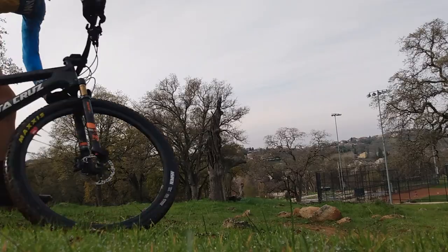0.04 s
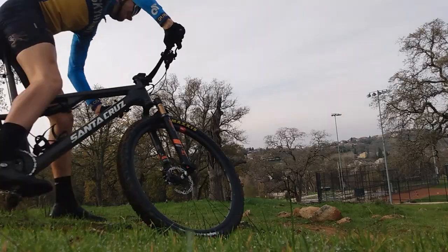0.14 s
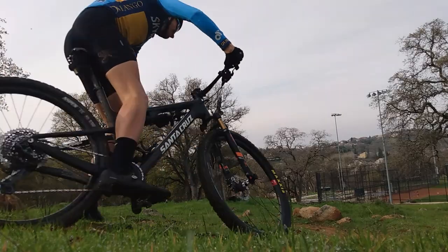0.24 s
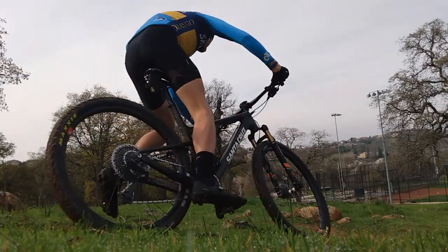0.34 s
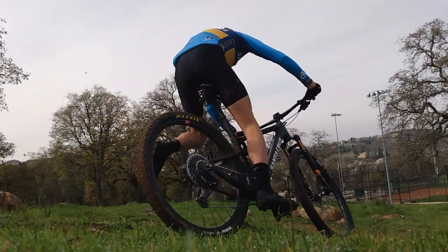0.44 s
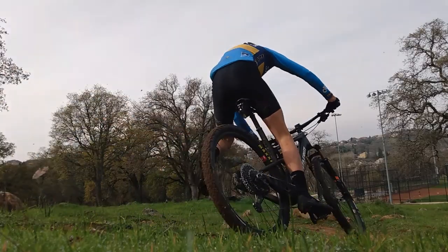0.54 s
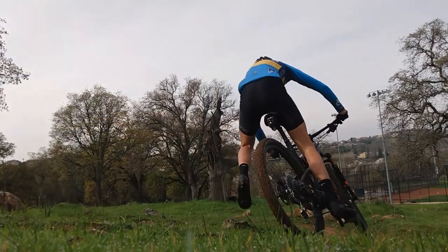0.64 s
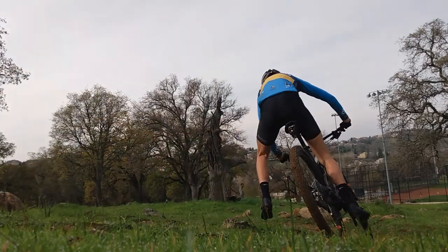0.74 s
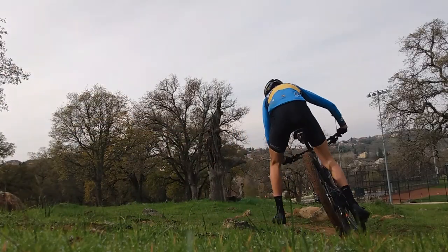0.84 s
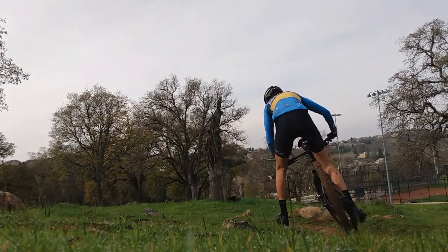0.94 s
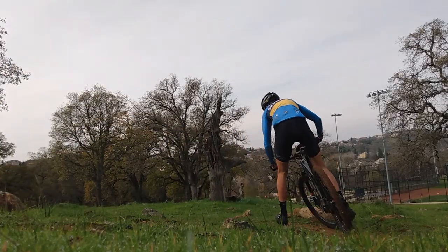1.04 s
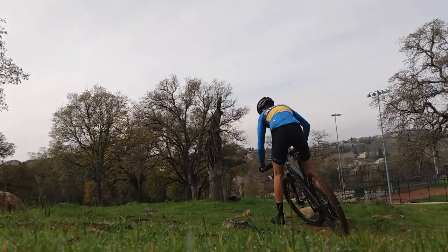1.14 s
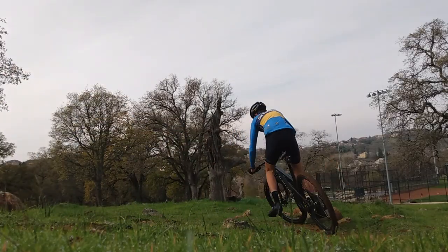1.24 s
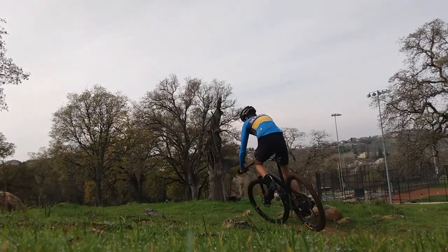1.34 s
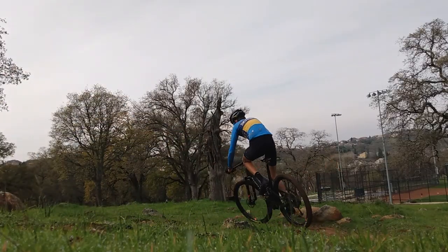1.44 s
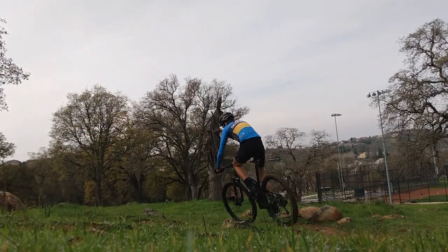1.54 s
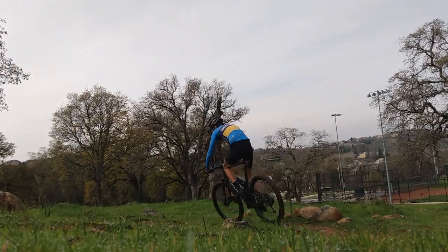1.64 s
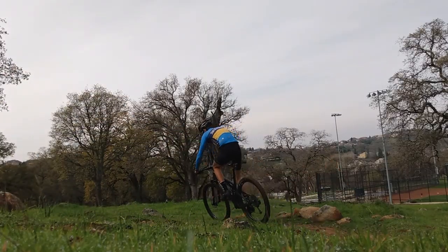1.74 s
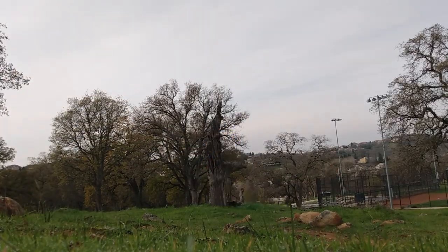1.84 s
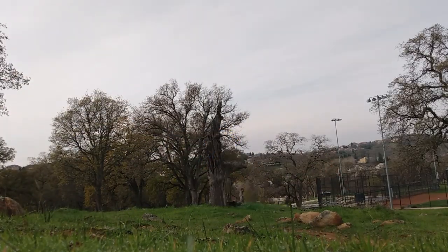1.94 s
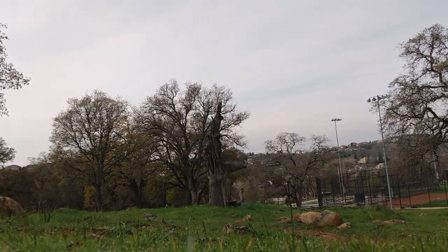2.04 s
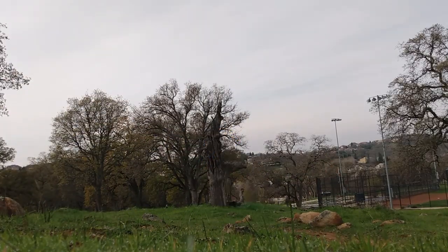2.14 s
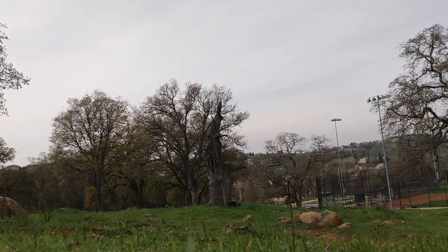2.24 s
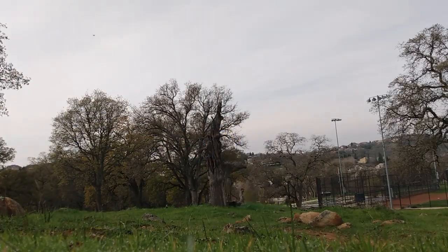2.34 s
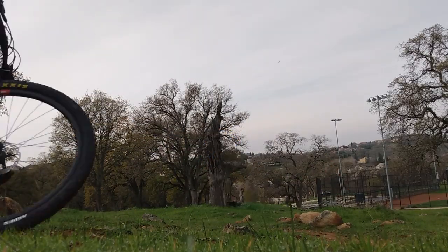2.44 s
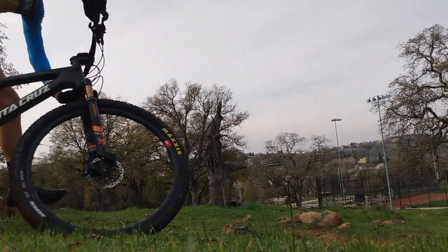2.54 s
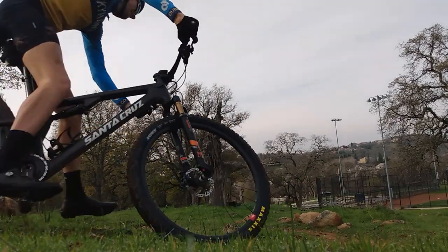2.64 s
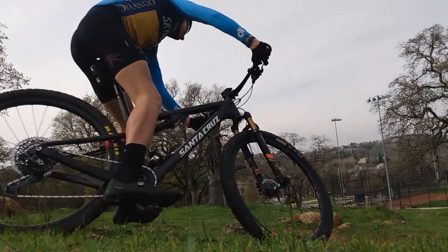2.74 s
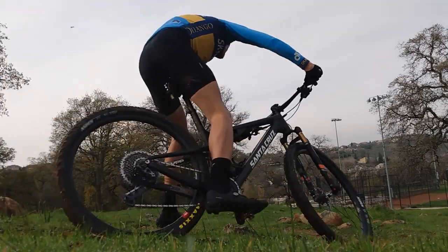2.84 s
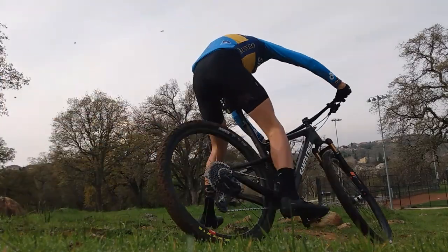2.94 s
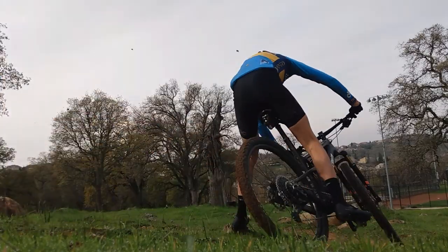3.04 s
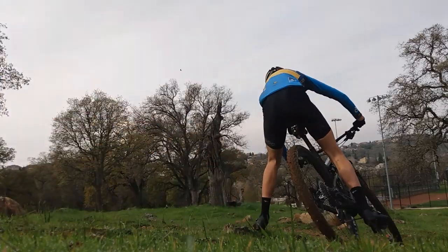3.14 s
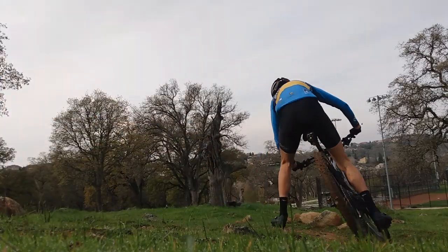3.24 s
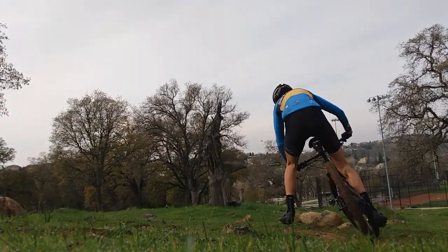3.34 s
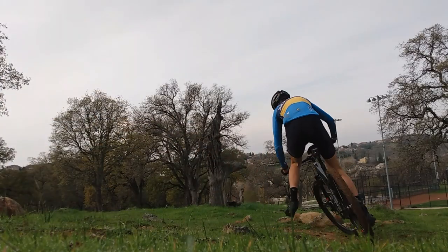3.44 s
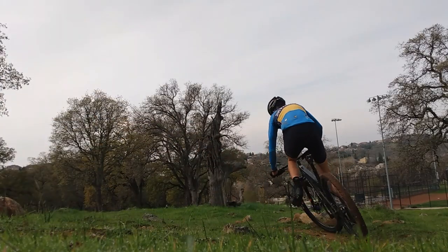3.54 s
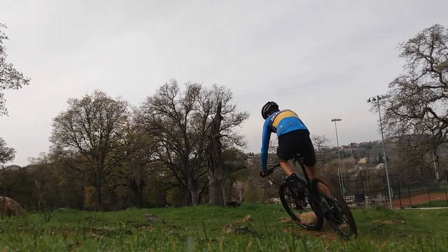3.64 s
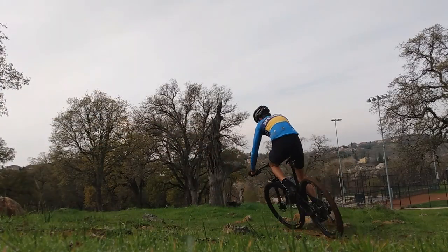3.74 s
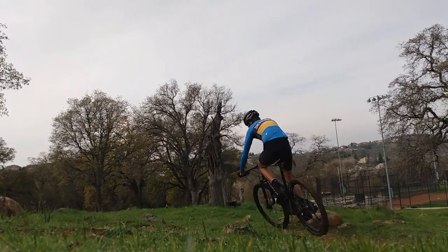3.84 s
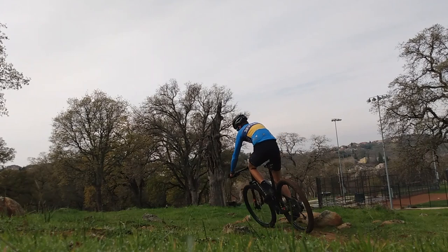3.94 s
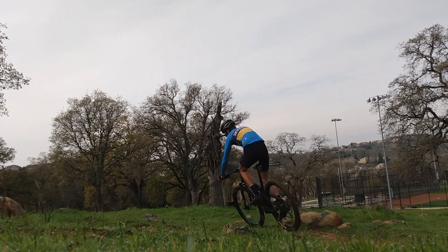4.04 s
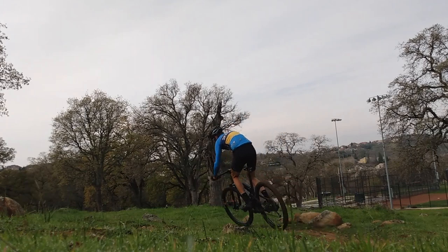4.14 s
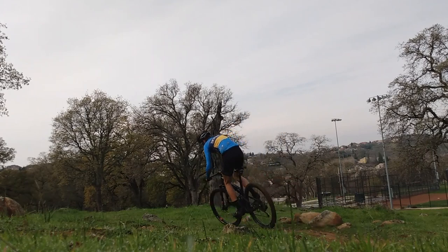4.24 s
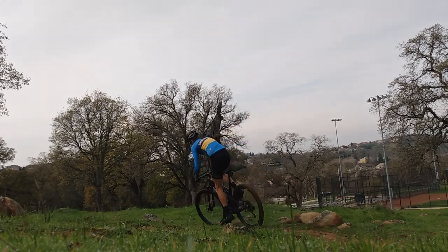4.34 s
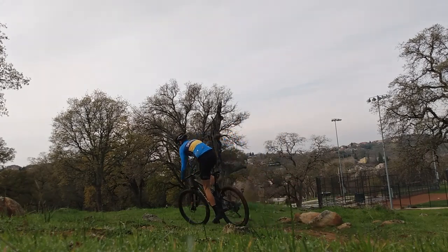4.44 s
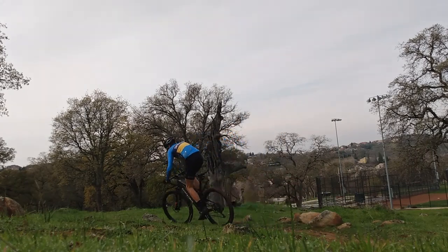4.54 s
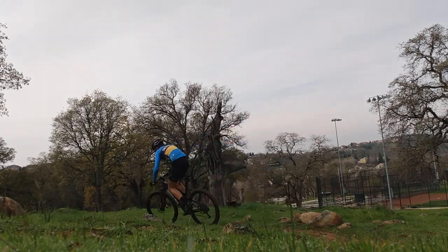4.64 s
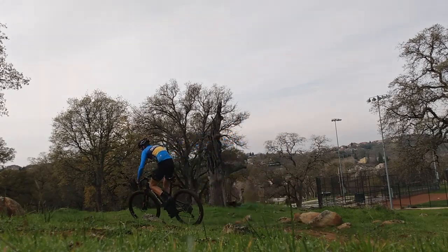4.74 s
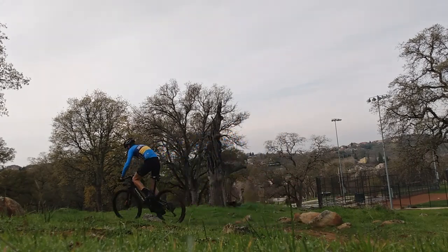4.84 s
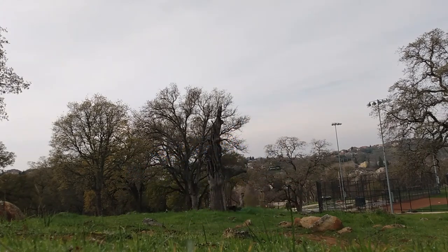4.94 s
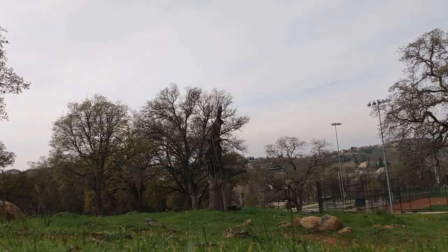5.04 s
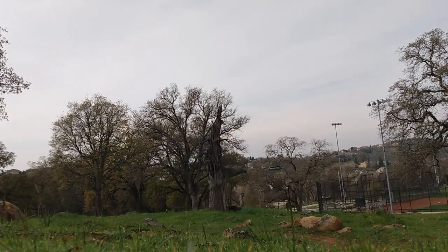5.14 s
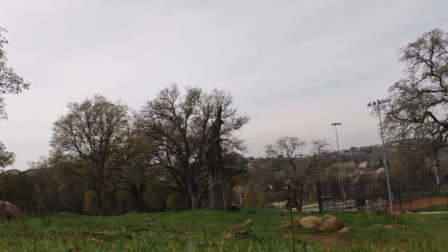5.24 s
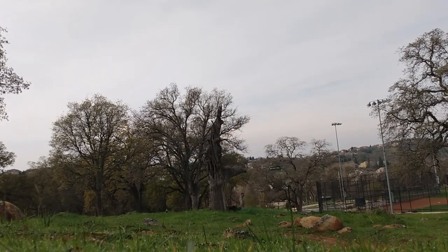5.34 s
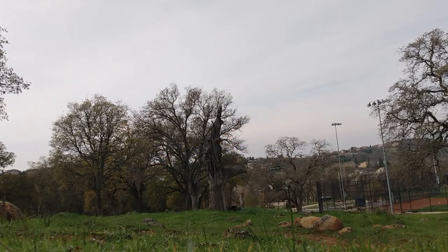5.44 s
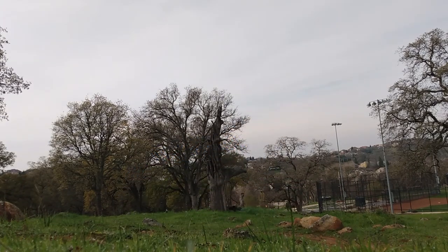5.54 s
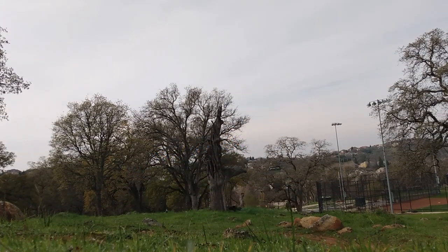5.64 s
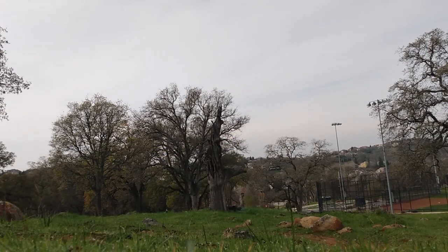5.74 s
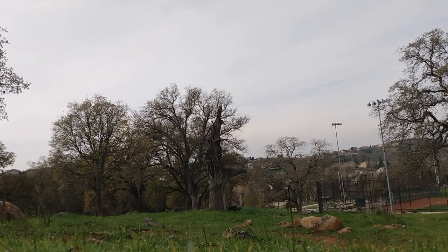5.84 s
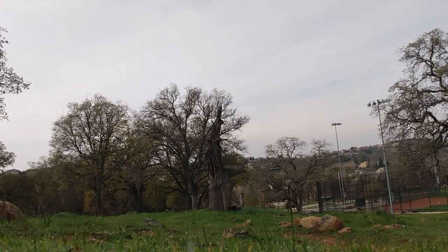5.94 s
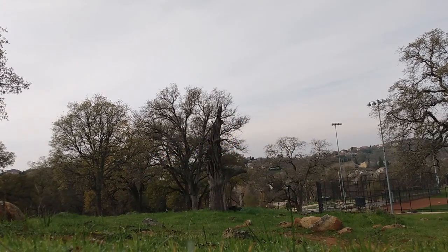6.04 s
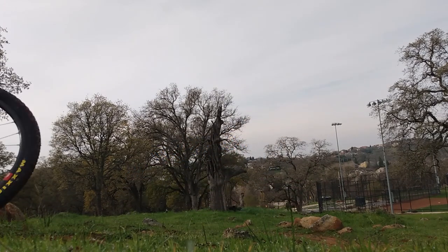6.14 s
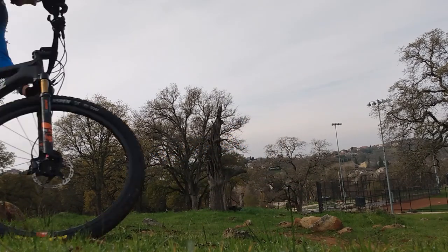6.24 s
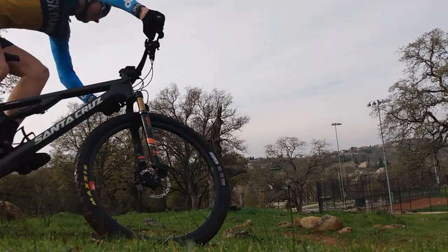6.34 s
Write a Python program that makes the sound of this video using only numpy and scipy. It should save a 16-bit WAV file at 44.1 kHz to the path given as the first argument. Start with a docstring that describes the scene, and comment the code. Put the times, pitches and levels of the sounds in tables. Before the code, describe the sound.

A mountain bike coasts over dirt and grass past a low stereo microphone outdoors. It begins already close on the right: scraping, gritty tyres, a very hard knock at 0.1 s and low ground thumps. From 0.3 s a sharp metallic freewheel ratchet buzzes as the bike swings ahead by about 0.4 s, slowing and fading under gusty low wind, with small bumps near 1.7 s. A brief dip at 1.87 s joins a second approach: knocks at 2.1 s, a strong tyre scrub at 2.5 s, bright ratcheting and roar peaking around 2.9 s, then a violent rattling cluster at 3.2 s. It recedes, with a jolt at 3.9 s and thin chain whirr and sparse ticks until 4.9 s. After another dip at 4.97 s, very faint ratcheting and tyre hiss grow on the right, clearer after 6 s, cutting off at 6.4 s.

```python
"""A mountain bike coasts past a low pair of microphones in three passes, joined by short fades.
First it is close, knocks hard, swings from the right to ahead at 0.4 s and recedes; from 1.87 s it nears again,
swings at 2.9 s, clatters at 3.2 s and recedes; from 4.97 s it nears once more, ending still on the right.
Tyres and chain are coloured grains, narrow bands resonant noise, ratchet snaps and knocks decaying bursts;
filtered noise makes the ground thumps, gusty wind and distant hush beneath."""
import sys
import numpy as np
from scipy import signal
from scipy.fft import rfft, irfft
from scipy.io import wavfile
from scipy.ndimage import uniform_filter1d, map_coordinates

SR = 44100
rng = np.random.default_rng(int(sys.argv[2]) if len(sys.argv) > 2 else 0)


def inscribe(sig):
    """Save sig as 16-bit PCM at rate SR to the path in sys.argv[1].

    A 1-D sig is mono; a 2-D sig holds one channel per row.
    Samples are clipped to [-1, 1] before scaling.
    """
    pcm = np.round(np.clip(np.atleast_2d(sig).T, -1, 1) * 32767)
    wavfile.write(sys.argv[1], SR, pcm.astype(np.int16))


def attenuation_scalar(level_db):
    """Turn a level in dB into a linear amplitude multiplier (20 dB per decade)."""
    decades = np.asarray(level_db, float) / 20
    return 10 ** decades


N = 281648

# Passes. Each row: start in seconds, end in seconds.
PASSES_S = [(0, 1.87), (1.87, 4.965), (4.965, 6.39)]
FADE_OUT_S, FADE_IN_S = 0.035, 0.015

# Swing from right to ahead, a row a pass. Each row: middle in seconds, time constant in seconds.
SWINGS_S = [(0.422, 0.21), (2.948, 0.21), (6.75, 0.395)]
RIGHT_MS, AHEAD_MS = 0.371, -0.095  # delay of the left port at either end of the swing
# Likeness of the ports. Each row: frequency in Hz, likeness from 0 to 1.
LIKENESS = [(60, 0.13), (130, 0.76), (500, 0.91), (1500, 0.65), (3000, 0.47), (6000, 0.17), (15000, 0.15)]
# Treble lean to the side of the bike. Each row: frequency in Hz, multiplier of the lean.
LEAN_SHARE = [(100, 0.11), (1000, .3), (4000, .8), (10000, 0.97), (16000, 4.9)]
LEAN_DB, LEAN_DB_PER_MS = 0.5, -6.5  # left over right, before LEAN_SHARE

# Spectra of the surroundings. Each row: frequency in Hz, relative level in dB per Hz.
GROUND_DB = [(45, -25.5), (65, -7.5), (85, -8), (125, -2.5), (170, -15.5), (240, -19.5)]
WIND_DB = [(15, -5.5), (30, -10.5), (50, -1.5), (80, 1.5), (130, -22.5)]
HUSH_DB = [(200, 8), (400, 1.5), (1200, -1), (1700, -1), (2500, -11), (4500, -8.5), (8000, -14.5),
           (12000, -22), (16000, -30)]
HUSH_LEVEL_DB = -73
# Breeze before gusts. Each row: time in seconds, level in dB.
BREEZE_DB = [(0, -60), (.5, -64), (.85, -59.5), (1.0, -60), (1.25, -59), (1.45, -64), (1.86, -54.5),
             (1.88, -97), (2.4, -83), (2.65, -58), (3.0, -72.5), (3.55, -66.5), (3.8, -73.5), (4.05, -81),
             (4.96, -85.5), (4.97, -78), (5.15, -68.5), (5.4, -72.5), (5.7, -62.5), (5.9, -72), (6.39, -66)]
BUFFET_DB, ROLL_DB, GUST_DB = -6.5, -18.5, 4  # buffet over breeze, rumble over nearness, gust depth
# Wheel thumps through the ground. Each row: start in seconds, length in seconds, level in dB.
THUMPS = [(0.05, 0.15, -56.5), (0.16, 0.18, -39.5), (0.332, 0.079, -47.5), (0.436, 0.032, -47),
          (.57, 0.035, -75), (0.785, .09, -53.5), (1.045, 0.017, -56), (1.227, 0.055, -62.5),
          (1.614, 0.021, -50), (1.76, .05, -69), (2.147, 0.08, -65), (2.508, 0.22, -53),
          (2.744, 0.082, -47.5), (3.08, .06, -57.5), (3.164, 0.088, -49), (3.287, .05, -55),
          (3.53, 0.045, -80), (3.9, 0.046, -67), (5.112, .04, -65), (5.597, 0.0433, -63),
          (5.67, 0.057, -60), (6.324, 0.072, -64)]
HUMP_RISE, HUMP_T60_S = 0.53, 0.088  # rise as share of the length

# Whirr of chain and spokes. Each row: time in seconds, level in dB.
WHIRR_DB = [(4.05, -75.5), (4.22, -70.5), (4.4, -70), (4.75, -70), (4.88, -61), (4.96, -78), (4.98, -80),
            (5.25, -79.5), (5.45, -71.5), (6.0, -70.5)]
# Chain spectrum. Each row: frequency in Hz, relative level in dB per Hz.
CHAIN_DB = [(7000, -21.5), (9500, -5), (12000, 3.5), (16000, 1)]

# Narrow bands of noise that swell or fade. Each row: start in seconds, length in seconds, level in dB,
# fall in dB per second (negative swells), centre in Hz.
BANDS = [(.84, .78, -51.5, 35.5, 1053), (0.899, .3, -57, 35, 1420), (3.306, 0.61, -57, 58.5, 1050),
         (3.871, .2, -62, 103.5, 1107), (4.2, 0.61, -75.5, 0, 1400), (4.242, .2, -67.5, 24, 340),
         (4.62, .2, -68, 11.5, 700), (4.7, .25, -72, -10.5, 320), (4.68, .27, -75.5, -4.5, 2860),
         (4.98, 1.05, -70.5, -5.5, 2346), (4.99, .17, -65, 39.5, 980), (4.988, .25, -71, 18, 1350),
         (5.2, .2, -77.5, 3.5, 580), (5.337, .17, -63, 61.5, 1005), (5.579, 0.2, -67, 29, 520)]
BAND_WIDTH = 0.25  # share of the centre frequency

# Knocks of frame, chain and rim. Each row: start in seconds, level in dB (offset for thud and rattle),
# thud pitch in Hz, chain clack in dB.
KNOCKS = [(0.033, -40.5, 468, -16.5), (0.102, -12.5, 810, -25.5), (0.206, -24.5, 280, -41),
          (0.293, -29, 250, -19), (0.313, -17, 331, -47), (0.332, -31.5, 479, -28),
          (0.353, -16.5, 301, -26), (0.372, -36, 275, -73), (0.413, -25.5, 275, -21),
          (0.608, -32.5, 708, -57), (0.683, -31, 762, -43), (0.709, -25, 673, -36),
          (0.738, -42, 579, -32.5), (0.776, -29, 690, -46), (0.79, -22.5, 560, -32),
          (0.841, -30.5, 670, -46), (1.649, -33.5, 444, -54), (1.6655, -51.5, 600, -20),
          (1.6765, -28, 950, -20), (1.688, -49, 315, -40), (1.731, -40, 560, -36), (1.774, -36.5, 549, -45),
          (1.818, -44, 458, -72), (1.893, -41.5, 439, -50.5), (1.967, -46, 495, -48),
          (2.094, -38, 673, -30), (2.104, -29, 738, -22), (2.125, -42, 608, -35), (2.143, -28, 576, -41),
          (2.162, -24.5, 592, -33), (2.538, -29, 826, -23.5), (2.803, -34.5, 361, -30.5),
          (3.14, -35, 584, -29.5), (3.185, -6, 659, -24), (3.1945, -15, 797, -26.5),
          (3.2037, -8.5, 600, -18), (3.211, -6.5, 759, -22), (3.218, -14.5, 641, -27.5),
          (3.224, -17.5, 695, -29.5), (3.254, -32, 797, -45), (3.417, -38, 554, -43),
          (3.846, -38, 565, -52.5), (3.8738, -22, 625, -40), (3.88, -24, 1193, -24.5),
          (3.889, -25, 953, -33), (4.402, -55, 369, -65), (4.696, -44, 684, -64),
          (4.713, -41.5, 676, -70.5), (4.827, -43.5, 934, -45), (4.836, -37, 900, -32.5),
          (4.846, -35, 536, -36), (4.858, -42.5, 331, -55), (5.436, -53.5, 600, -74.5),
          (5.883, -42.5, 600, -65), (6.247, -30, 250, -36)]
# Rattle after a knock. Each row: frequency in Hz, relative level in dB per Hz.
BODY_DB = [(150, -15), (300, -10), (700, -3), (1200, -3), (2500, -26.5)]
TICK_DB, CLACK_RISE_S = -12, 0.00082  # bright tick under the clack

# Ratchet drive, a table a coast. Each row: time in seconds, teeth passed so far.
TEETH = [
    [(0.283, 0), (0.413, 10), (0.549, 20), (0.695, 28), (0.815, 33), (0.865, 37), (0.908, 40), (0.973, 43),
     (1.054, 48), (1.087, 51), (1.123, 53), (1.173, 57), (1.243, 62), (1.326, 67), (1.48, 77), (1.635, 86),
     (1.676, 89), (1.724, 92), (1.817, 96), (1.847, 97)],
    [(2.205, 0), (2.377, 12), (2.522, 21), (2.634, 28), (2.714, 31), (2.924, 48), (3.149, 64), (3.261, 69),
     (3.378, 78), (3.422, 80), (3.453, 82), (3.512, 86), (3.534, 87), (3.556, 89), (3.576, 90), (3.601, 92),
     (3.622, 93), (3.678, 97), (3.739, 102), (3.796, 105), (3.813, 106), (3.862, 110), (3.973, 117),
     (3.995, 118), (4.079, 121), (4.111, 122)],
    [(4.99, 0), (5.321, 28), (5.399, 35), (5.4455, 39), (5.503, 44), (5.656, 57), (5.692, 59), (5.754, 63),
     (5.8175, 68), (5.8715, 72), (5.929, 76), (6.056, 84), (6.171, 92), (6.242, 97), (6.373, 105)],
]
# Pawl snaps before scatter, a table a coast. Each row: time in seconds, level in dB.
RATCHET_DB = [
    [(0.283, -29), (.42, -32.5), (0.65, -33.5), (0.9, -38), (1.08, -46.5), (1.25, -42.5), (1.36, -41.5),
     (1.47, -40.5), (1.67, -41.5), (1.847, -46.5)],
    [(2.205, -44.5), (2.36, -47), (2.56, -41.5), (2.67, -39), (2.88, -29), (3.12, -32.5), (3.46, -42.5),
     (3.62, -41.5), (3.7, -41), (3.82, -43), (3.95, -41.5), (4.111, -42)],
    [(4.99, -67), (5.311, -63.5), (5.46, -58), (5.57, -57), (5.76, -50), (5.9, -51), (6.17, -40.5),
     (6.24, -38), (6.373, -37)],
]
# Lone pawl and chain ticks. Each row: time in seconds, level in dB before scatter.
TICKS_DB = [(2.0571, -41), (2.1028, -65), (4.2428, -52.5), (4.2849, -53.5), (4.2988, -55), (4.4028, -46),
            (4.4472, -49.5), (4.5466, -61.5), (4.596, -50), (4.6441, -52.5), (4.7146, -50), (4.8983, -48.5),
            (5.1312, -70)]
# Hub spectra, from ahead and from behind. Each row: frequency in Hz, relative level in dB per Hz.
PAWL_FRONT_DB = [(1500, -30.5), (2350, -6.5), (3300, -15.5), (4500, -19), (5500, -9.5), (7000, -14),
                 (10000, -11.5), (13000, -6), (15500, -4), (16200, -7)]
PAWL_BACK_DB = [(1500, -37.5), (2700, -11), (4500, -22), (6000, -14), (8000, -12.5), (11000, -7.5),
                (13500, -3.5), (16000, -8.5)]
SNAP_RISE_S, SNAP_T60_S, SHELL_DB, SHELL_T60_S = 0.0004, 0.008, -7, 0.04
STRIKE_DB = 10.5  # first contact over the rattle, before colouring
# Highest mode of the hub shell; spread is a share of its pitch.
RING_HZ, RING_DB, RING_T60_S, RING_SPREAD = 15400, -5.5, 0.02, 0.016

# Tyre spectra: casing, tread blocks, grit, grass. Each row: frequency in Hz, relative level in dB per Hz.
THRUM_DB = [(120, -27.5), (200, 1), (300, 0), (500, 0.5), (700, 0), (1200, -25.5)]
ROAR_DB = [(400, -27.5), (650, -9), (850, -1), (1300, -7), (1700, -9), (2500, -41.5)]
GRIT_DB = [(900, -10), (1400, -1.5), (2500, 0.5), (3300, -5.5), (4500, -11.5), (8000, -39)]
SWISH_DB = [(3000, -18), (4500, 2.5), (6000, -1.5), (8000, 2), (11000, 0.5), (14000, 3.5), (16000, -4)]
# Rolling, a table a pass. Each row: time in seconds, nearness as grass swish level in dB,
# lumpiness of the ground in dB before each layer's factor.
RIDE = [
    [(0, -42.5, 7.5), (.3, -45, -9.5), (.45, -48, -4), (.65, -46.5, -8.5), (.88, -55, -1),
     (1.1, -61, -15.5), (1.35, -62, -10.5), (1.6, -65, -9), (1.72, -58, 9.5), (1.87, -71, -22)],
    [(1.871, -81.5, 8), (1.95, -66, 1), (2.08, -63, 10), (2.25, -61, 7), (2.46, -52, 0), (2.68, -45, 7),
     (2.83, -44.5, -4), (3.08, -45.5, -4.5), (3.34, -51.5, -1), (3.8, -65, -15.5), (3.93, -61.5, 3),
     (4.15, -70.5, -12.5), (4.5, -82.5, -12.5), (4.96, -85.5, -9)],
    [(4.966, -82.5, -7), (5.4, -73.5, -7), (5.6, -66.5, -14.5), (5.8, -70, 3.5), (6.0, -65, 11),
     (6.23, -52.5, 5), (6.39, -50, -0.5)],
]
# Layer laws: dB at nearness -55, dB per dB of nearness, dB per dB of lumpiness, dB per ms of bearing.
THRUM_LAW, ROAR_LAW, GRIT_LAW = (-54, 1.0636, 1.1, -5.2), (-56, 0.68, 0.42, 0.7), (-57, 0.76, 0.03, 10)
# Slides and jolts. Each row: start in seconds, length in seconds, tread roar in dB,
# grit over roar in dB, casing thrum over roar in dB.
SCRUBS = [(0.007, 0.094, -30, -2.5, -21), (0.072, 0.11, -32.5, 0, -4.5), (0.165, 0.098, -38.5, 3.5, 2),
          (0.28, 0.019, -32, -0.5, 3.5), (0.317, 0.059, -38.5, -1.5, -3), (.40, 0.0083, -49.5, -11.5, 4.5),
          (0.548, 0.053, -64, -7, 9), (0.681, .11, -40.5, -6, -0.5), (1.653, 0.021, -44.5, -2.5, 10),
          (1.802, 0.014, -54.5, -10.5, 8.5), (1.887, .03, -63, -19, -7), (2.084, .04, -39.5, -11, -14),
          (2.129, 0.032, -53, 6.5, 13), (2.45, 0.11, -39, -6, -14.5), (2.533, 0.058, -28, -5, -12),
          (2.582, 0.062, -31, -3.5, -10.5), (3.109, .05, -42, -8, -2), (3.163, 0.053, -35, -6.5, 3.5),
          (3.239, .022, -42, -12.5, -6), (3.865, 0.016, -39, -21, -5), (4.232, 0.034, -77.5, -14, 11),
          (4.392, 0.026, -71.5, -15.5, 4), (4.823, 0.025, -52.5, -2, -0.5), (4.87, 0.072, -65, -5.5, -4.5),
          (5.423, .03, -63, -17.5, -8), (5.68, 0.019, -75.5, 9.5, 3.5), (5.796, 0.014, -69.5, 0.5, 7),
          (6.238, 0.015, -63, -7, 3)]
SCRUB_SWISH_DB, SCRUB_SWISH_SLOPE = -53, 0.49  # swish for grit at -40 dB, dB per dB

# Dip of the microphone housing (share removed at its centre) and band limit.
DIP_HZ, DIP_WIDTH_HZ, DIP_SHARE = 4695, 950, 0.5
EDGE_HZ = 16020


def evened(x):
    """Scales the whole array to rms 1."""
    return x / np.sqrt(np.mean(x ** 2) + 1e-20)


def read(points, hz):
    """Reads a spectrum on a log-frequency axis."""
    f, value = np.transpose(points)
    return np.interp(np.log(hz + 1), np.log(f + 1), value)


def curve(rows, column=1):
    """Joins one column of a table over every sample."""
    rows = np.asarray(rows, float)
    return np.interp(np.arange(N) / SR, rows[:, 0], rows[:, column])


def coloured(x, points):
    """Filters by a spectrum that falls 40 dB just outside its ends."""
    below = (points[0][0] / 2, points[0][1] - 40)
    above = (points[-1][0] * 1.7, points[-1][1] - 40)
    n = x.shape[-1]
    gain = attenuation_scalar(read([below, *points, above], np.fft.rfftfreq(n, 1 / SR)))
    return irfft(rfft(x, axis=-1) * gain, n, axis=-1)


def add(mix, s, sound):
    """Mixes a sound in at time s."""
    part = mix[max(round(s * SR), 0):][:len(sound)]
    part += sound[:len(part)]


def smoothed_noise(width):
    """Slow random curve: noise averaged twice, rms 1."""
    return evened(uniform_filter1d(uniform_filter1d(rng.standard_normal(N), width), width))


def grains(per_s, spread_db, lump_db, lump_s, points):
    """Sparse snaps of uneven size, bunched in lumps, through a colour."""
    snaps = rng.standard_normal(N) * (rng.random(N) < per_s / SR)
    snaps *= attenuation_scalar(spread_db * np.minimum(rng.exponential(1, N), 4))
    lumps = smoothed_noise(max(round(lump_s * SR), 1))
    return evened(coloured(snaps * attenuation_scalar(lump_db * lumps), points))


def humps(rows, levels_db):
    """Envelope of events that rise, hold for the rest of their length and die away."""
    out = np.zeros(N)
    for (s, length_s, *_), db in zip(rows, levels_db):
        t = np.arange(0, length_s + HUMP_T60_S, 1 / SR)
        rise = np.minimum(t / (HUMP_RISE * length_s), 1)
        add(out, s, rise * attenuation_scalar(db - 60 * np.maximum(t - length_s, 0) / HUMP_T60_S))
    return out


def bearing_ms():
    """Delay of the left port: each pass follows a tanh swing from the right toward ahead."""
    t, out = np.arange(N) / SR, np.zeros(N)
    for (start, _), (middle, takes) in zip(PASSES_S, SWINGS_S):
        rightness = (1 - np.tanh((t - middle) / takes)) / 2
        out = np.where(t >= start, AHEAD_MS + (RIGHT_MS - AHEAD_MS) * rightness, out)
    return out


def patchy(x, patchy_db):
    """Random patches of level in time and frequency, like the blobs a noise suppressor leaves."""
    z = signal.stft(x, SR, nperseg=1024, noverlap=512)[2]
    patches = uniform_filter1d(rng.standard_normal(z.shape[-2:]), size=10, axis=1)
    patches = evened(uniform_filter1d(patches, size=3, axis=0))
    return signal.istft(z * attenuation_scalar(patchy_db * patches), SR, nperseg=1024, noverlap=512)[1][..., :N]


def surroundings():
    """Ground thumps mostly shared by the ports, wind noise of its own on each, and a distant hush."""
    shared, left, right = evened(coloured(rng.standard_normal((3, N)), GROUND_DB))
    breeze = attenuation_scalar(curve(BREEZE_DB) + GUST_DB * smoothed_noise(2600))
    rumble = attenuation_scalar(curve(np.concatenate(RIDE)) + ROLL_DB)
    ground = rumble + humps(THUMPS, np.transpose(THUMPS)[2]) + attenuation_scalar(BUFFET_DB) * breeze
    thump = ground * (shared + 0.13 * np.array([left, right]))
    wind = breeze * evened(coloured(rng.standard_normal((2, N)), WIND_DB))
    hush = patchy(evened(coloured(rng.standard_normal((2, N)), HUSH_DB)), 3.0)
    return thump + wind + attenuation_scalar(HUSH_LEVEL_DB) * hush


def chain():
    """Dense tiny clicks of rollers on teeth."""
    start_s, end_s = WHIRR_DB[0][0], WHIRR_DB[-1][0]
    sounding = np.zeros(N)
    add(sounding, start_s, signal.windows.tukey(round((end_s - start_s) * SR), 0.08))
    return sounding * attenuation_scalar(curve(WHIRR_DB)) * grains(11000, 1.5, 1.0, 0.012, CHAIN_DB)


def narrow_bands():
    """Bands of noise that swell or fade: noise in one resonance."""
    out = np.zeros(N)
    for s, length_s, db, fall_db, hz in BANDS:
        t = np.arange(0, length_s, 1 / SR)
        r = np.exp(-np.pi * BAND_WIDTH * hz / SR)
        noise = rng.standard_normal(len(t)) + 1j * rng.standard_normal(len(t))
        slow = signal.lfilter([1], [1, -2 * r, r * r], noise)
        band = (slow * np.exp(2j * np.pi * hz * t)).real  # shifted up to the centre
        add(out, s, attenuation_scalar(db - fall_db * t) * evened(band) * signal.windows.tukey(len(t), 0.15))
    return out


def knocks():
    """A short hollow thud of tyre and frame with a rough rattling tail, a clack of the chain, a bright tick."""
    t, out = np.arange(4096) / SR, np.zeros(N)
    rise, clack_rise = np.minimum(t / 0.0025, 1), np.minimum(t / CLACK_RISE_S, 1)
    noise = rng.standard_normal((len(KNOCKS), 3, len(t)))
    rattles = evened(coloured(noise[:, 0], BODY_DB))
    clacks = evened(coloured(noise[:, 1], GRIT_DB))
    ticks = evened(coloured(noise[:, 2], SWISH_DB))
    for (s, db, hz, clack_db), rattle, clack, tick in zip(KNOCKS, rattles, clacks, ticks):
        thud = attenuation_scalar(db + 6 - 60 * t / 0.015) * np.sin(2 * np.pi * hz * t)
        tail = attenuation_scalar(db - 11.5 - 60 * t / 0.064) * rattle
        chain_slap = attenuation_scalar(-60 * t / 0.013) * clack + attenuation_scalar(TICK_DB - 60 * t / 0.03) * tick
        add(out, s, rise * (thud + tail) + clack_rise * attenuation_scalar(clack_db) * chain_slap)
    return signal.sosfilt(signal.butter(2, 180, "high", fs=SR, output="sos"), out)


def freewheel():
    """Each tooth drops the pawls: a sharp snap, then the hub shell rattles and rings; colour follows bearing."""
    t, out = np.arange(1300) / SR, np.zeros(N)
    rise = np.minimum(t / SNAP_RISE_S, 1)
    shape = rise * (attenuation_scalar(-60 * t / SNAP_T60_S) + attenuation_scalar(SHELL_DB - 60 * t / SHELL_T60_S))
    ring_shape = rise * attenuation_scalar(RING_DB - 60 * t / RING_T60_S)
    level_db = curve(np.concatenate(RATCHET_DB))
    facing = np.clip((bearing_ms() - AHEAD_MS) / (RIGHT_MS - AHEAD_MS), 0, 1)
    clicks = list(TICKS_DB)
    for coast in TEETH:
        s, teeth = np.transpose(coast)
        for drop_s in np.interp(np.arange(teeth[0], teeth[-1] + 1), teeth, s):
            clicks.append((drop_s, level_db[min(round(drop_s * SR), N - 1)]))
    noise = rng.standard_normal((len(clicks), len(t)))
    noise[:, round(SNAP_RISE_S * SR)] += attenuation_scalar(STRIKE_DB)
    fronts, backs = evened(coloured(noise, PAWL_FRONT_DB)), evened(coloured(noise, PAWL_BACK_DB))
    scatter = rng.standard_normal((len(clicks), 2))
    for (s, db), front, back, (louder, sharper) in zip(clicks, fronts, backs, scatter):
        share = facing[round(s * SR)]
        ring = ring_shape * np.sin(2 * np.pi * RING_HZ * (1 + RING_SPREAD * sharper) * t)
        snap = shape * (share * front + (1 - share) * back)
        add(out, s, attenuation_scalar(db + 0.98 * louder) * (ring + snap))
    return out


def tyres():
    """Thrum of the casing, roar of the tread, scrub of knobs on grit and swish of grass blades."""
    rows, side_ms = np.concatenate(RIDE), bearing_ms()
    near_db, lumpy_db = curve(rows), curve(rows, column=2)

    def roll(db, per_near, per_lump, per_ms):
        """Rolling level of one layer."""
        return attenuation_scalar(db + per_near * (near_db + 55) + per_lump * lumpy_db + per_ms * side_ms)

    roar_db, grit_over_db, thrum_over_db = np.transpose(SCRUBS)[2:]
    grit_db, thrum_db = roar_db + grit_over_db, roar_db + thrum_over_db
    swish_db = SCRUB_SWISH_DB + SCRUB_SWISH_SLOPE * (grit_db + 40)
    thrum = (roll(*THRUM_LAW) + humps(SCRUBS, thrum_db)) * grains(3400, 2.6, 0.4, 0.0053, THRUM_DB)
    roar = (roll(*ROAR_LAW) + humps(SCRUBS, roar_db)) * grains(3000, 0.9, 0.4, 0.022, ROAR_DB)
    grit = (roll(*GRIT_LAW) + humps(SCRUBS, grit_db)) * grains(7000, 2.3, 0.27, 0.0017, GRIT_DB)
    swish = (attenuation_scalar(near_db) + humps(SCRUBS, swish_db)) * grains(15000, 1.2, 0.94, 0.004, SWISH_DB)
    return thrum + roar + grit + swish


def ports(direct):
    """The left port hears the bike later or sooner; ground scatter makes the two differ, most in the treble."""
    late_ms = bearing_ms()
    at = np.arange(N) - np.array([[0.5], [-0.5]]) * late_ms * SR / 1000
    fine = signal.resample_poly(direct, 2, 1)  # finer grid for fractional delays
    pair = np.array([map_coordinates(fine, [2 * a], order=3) for a in at])
    hz, t, z = signal.stft(pair, SR, nperseg=256)
    same = np.clip(read(LIKENESS, hz), 0, 1)[:, None]
    turns = np.repeat(rng.random((z.shape[2] // 4 + 1, len(hz))), 4, 0)[:z.shape[2]].T  # held 4 frames
    z[1] *= same + np.sqrt(1 - same ** 2) * np.exp(2j * np.pi * turns)
    side_db = LEAN_DB + LEAN_DB_PER_MS * np.interp(t * SR, np.arange(N), late_ms)
    lean_db = np.outer(read(LEAN_SHARE, hz), side_db)
    z *= attenuation_scalar([lean_db / 2, -lean_db / 2])
    return signal.istft(z, SR, nperseg=256)[1][:, :N]


def scene():
    """Bike through the ports, plus the surroundings."""
    patched = patchy(tyres(), 1.3)
    return ports(patched + narrow_bands() + chain() + freewheel() + knocks()) + surroundings()


def suppress(x):
    """Noise suppressor: bins near their own usual quiet level are turned down, leaving streaky blobs."""
    hz, _, z = signal.stft(x, SR, nperseg=1024, noverlap=768)
    power = uniform_filter1d((abs(z) ** 2).mean(0), size=9, axis=1)
    power = uniform_filter1d(power, size=2, axis=0) + 1e-20
    quiet = uniform_filter1d(np.percentile(power, 15, axis=1), size=9)[:, None]
    keep = np.clip(1 - quiet / power, attenuation_scalar(-10), 1)
    keep = np.where(hz[:, None] > 150, keep, 1)
    return signal.istft(z * keep, SR, nperseg=1024, noverlap=768)[1][:, :N]


def low_pass(x):
    """Removes everything above the highest recorded frequency."""
    return signal.sosfilt(signal.butter(12, 17140, fs=SR, output="sos"), x)


def record(dry):
    """Housing dip, suppressor and band limit; each pass fades out and the next fades in."""
    t, fade = np.arange(N) / SR, np.ones(N)
    for joint, _ in PASSES_S[1:]:
        fade *= np.clip(np.maximum((joint - t) / FADE_OUT_S, (t - joint) / FADE_IN_S), 0.02, 1)
    peak = signal.lfilter(*signal.iirpeak(DIP_HZ, DIP_HZ / DIP_WIDTH_HZ, SR), dry)
    cleaned = suppress(dry - DIP_SHARE * peak)
    edge = signal.firwin(255, EDGE_HZ, window=("kaiser", 5), fs=SR)
    limited = signal.oaconvolve(cleaned, edge[None], "same")
    return low_pass(limited * fade)


dry = scene()
out = record(dry)
inscribe(out)
```